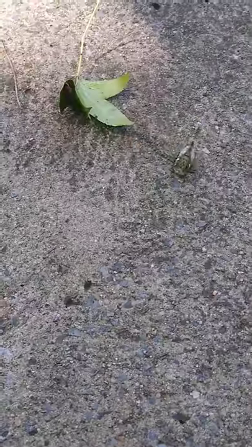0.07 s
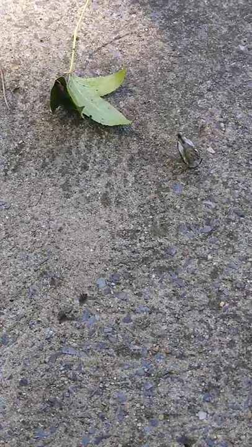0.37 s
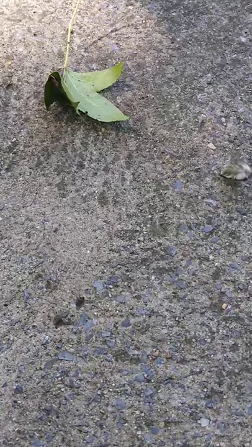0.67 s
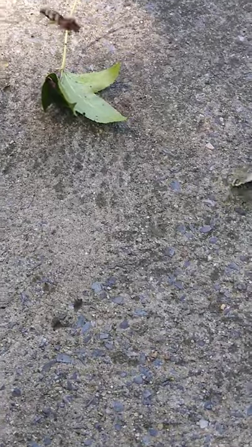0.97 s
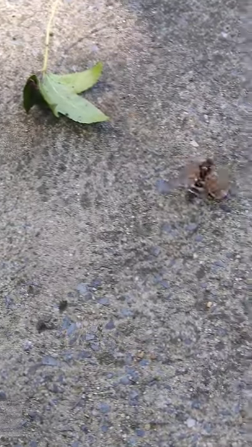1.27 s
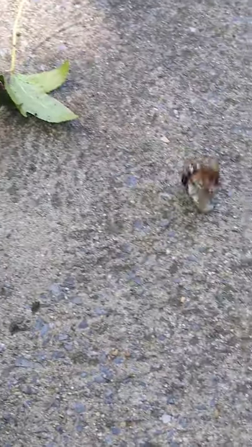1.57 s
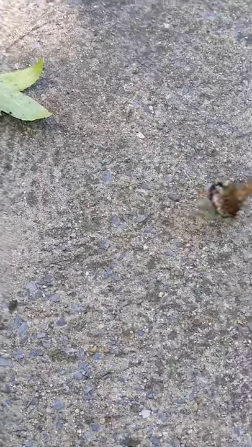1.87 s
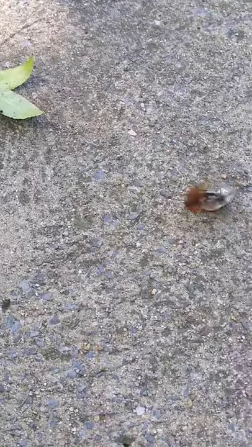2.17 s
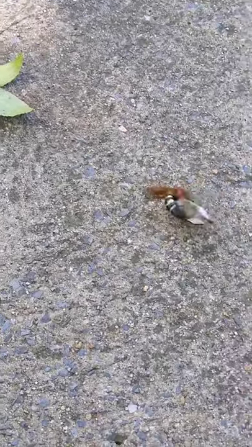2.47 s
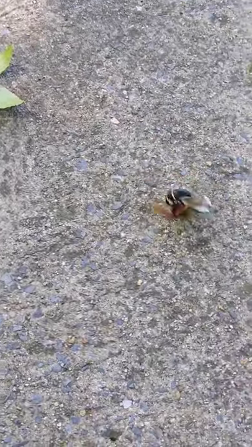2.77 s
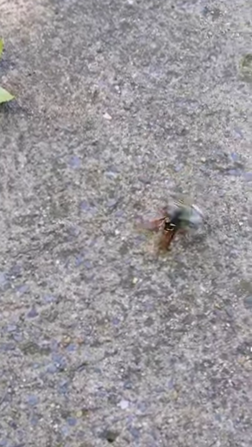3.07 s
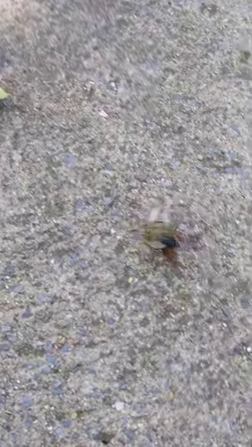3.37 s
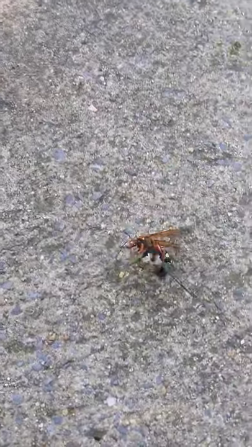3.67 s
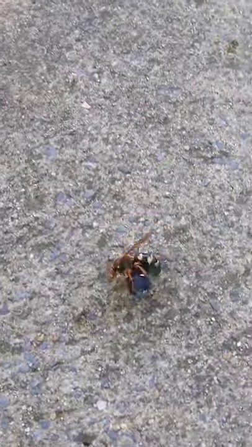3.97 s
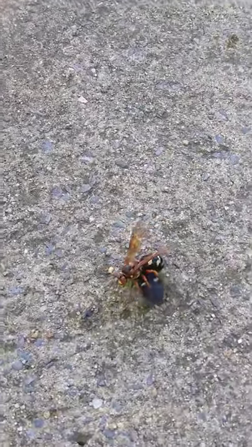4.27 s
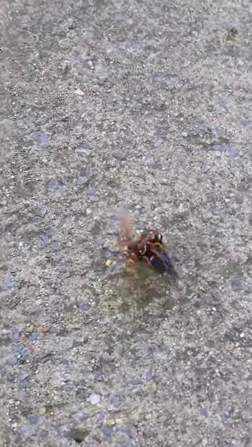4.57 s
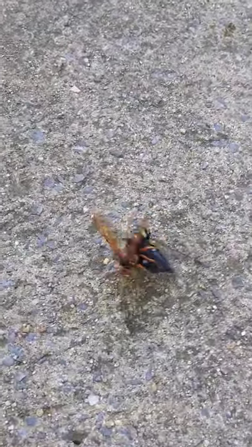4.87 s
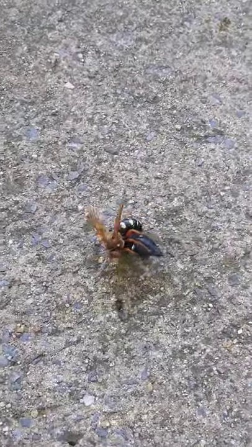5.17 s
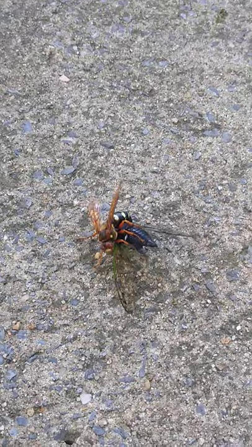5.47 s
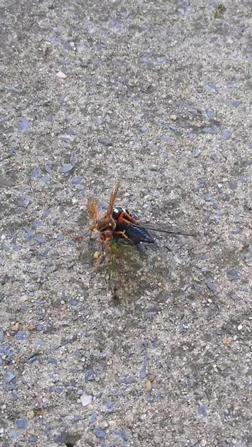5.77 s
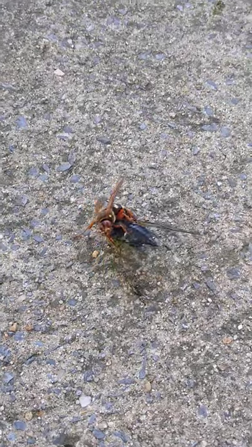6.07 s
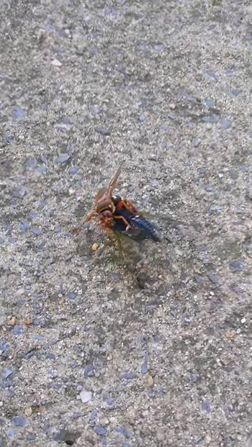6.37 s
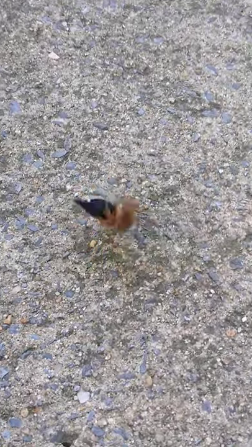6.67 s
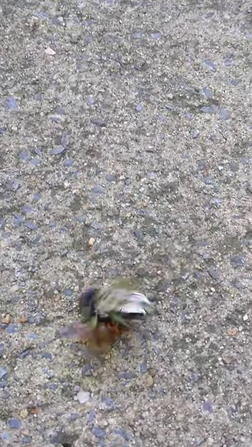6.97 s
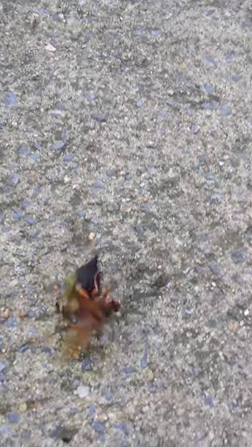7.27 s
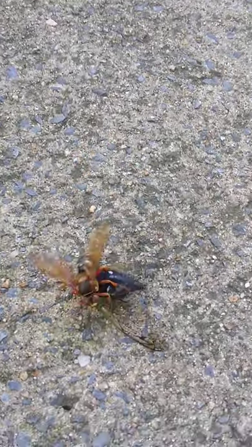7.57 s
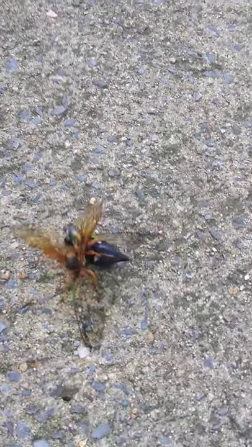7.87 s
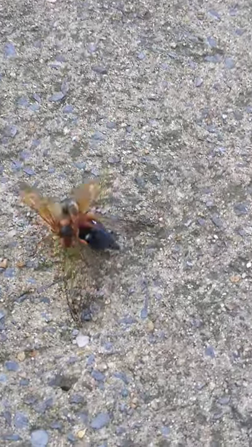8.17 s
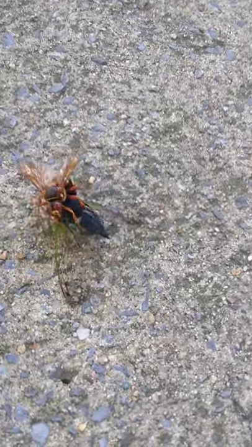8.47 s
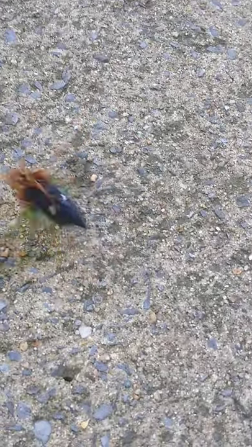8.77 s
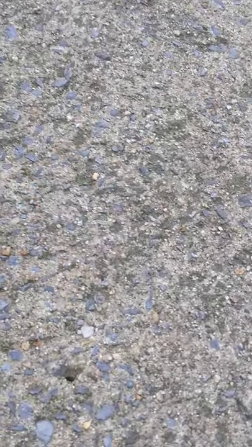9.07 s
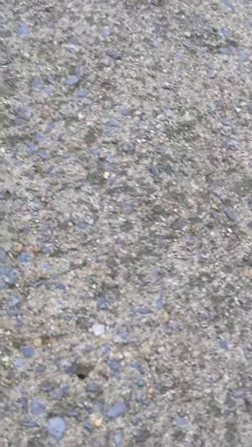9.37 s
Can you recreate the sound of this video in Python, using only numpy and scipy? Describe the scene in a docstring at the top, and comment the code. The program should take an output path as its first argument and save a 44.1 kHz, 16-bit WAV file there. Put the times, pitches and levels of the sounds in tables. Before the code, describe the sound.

A chorus of cicadas hisses steadily outdoors, with one throbbing quickly and a farther one whining. Close to the microphone, a wasp wrestles a cicada on concrete: stiff wings and legs tick sharply and scrape through grit in short spurts. The struggle stops for about two seconds midway, resumes, pauses again and returns briefly at the end. Distant machinery drones faintly underneath.

```python
"""Cicadas hiss in the trees, their ribbed tymbals clicking too densely to tell apart. One stands out,
throbbing about ten times a second as its belly tunes and detunes its call; a farther one whines.
Distant machinery drones underneath. Close by, a wasp wrestles a cicada on concrete:
stiff wings and legs tick against the ground and scrape through the grit in spurts."""
import sys
import numpy as np
from scipy import signal
from scipy.fft import rfft, irfft, next_fast_len
from scipy.io import wavfile
from scipy.ndimage import uniform_filter1d

SR = 44100
rng = np.random.default_rng(int(sys.argv[2]) if len(sys.argv) > 2 else 0)


def master(y):
    """Save y as 16-bit WAV."""
    cut = np.clip(np.atleast_2d(y).T, -1, 1)
    pcm = np.round(cut * 32767)  # scale
    wavfile.write(sys.argv[1], SR, pcm.astype(np.int16))


N = 415863
T = np.arange(N) / SR
TOP_HZ = 8380
WINGBEATS_PER_S, WINGBEAT_JITTER_S = 38, .0025
BLOW_LEAD_SAMPLES = 128  # a faint noise swell ahead of each snap, softening its attack

# swell of the chorus hiss: time_s, level_db
CHORUS_SWELL = [(0, -49), (1.5, -47), (2.4, -49.5), (5.3, -47.5), (7.4, -44), (9.43, -46.5)]
# EQ of the chorus hiss: frequency_hz, gain_db
CHORUS_EQ = [(1500, -25.5), (2100, -18.5), (2750, -10), (3350, -7), (3700, 1), (4250, -1.5), (4900, 1),
             (5800, -0.3), (6100, 0.5), (6500, 0.7), (7700, -3.5), (8000, -17.5), (8500, -37)]
# fader ride of the nearest singer: time_s, level_db
SINGER_SWELL = [(0, -53), (2.4, -58), (3.8, -57), (5.7, -52), (7.1, -50.5), (8.1, -52.5), (9.43, -73)]
# its pace: time_s, throbs_per_s
THROB_PACE = [(0, 9.95), (3.2, 9.35), (4.5, 9.65), (9.43, 9.75)]
# its belly's sweep through one throb: cycle_fraction, tuning_hz, gain_db
THROB_SHAPE = [(0, 5520, 2), (.06, 5300, 6), (.12, 4850, -2.5), (0.199, 4470, -4.5), (.27, 3330, -16),
               (.36, 2400, -9.5), (.58, 2500, -9), (.66, 2960, -3), (.72, 4600, -8), (.8, 5520, 2),
               (.9, 5520, -18), (1, 5520, -4)]
# its belly's ringing modes: pitch_hz, width_hz, gain_db
BELLY_MODES = [(2530, 290, -0.5), (3170, 130, -3.5), (3810, 450, 5.5), (4600, 1100, -8), (4900, 540, 1),
               (5520, 160, -0.5)]
# fader ride of the farther singer: time_s, level_db
WHINE_SWELL = [(0, -54.5), (1, -53), (2.5, -64), (2.9, -65), (5.3, -64.5), (6.2, -61), (7, -62),
               (9.43, -57)]
# swell of the machinery's rumble: time_s, relative_level_db
RUMBLE_SWELL = [(0, -47.5), (.9, -46), (4.3, -48.5), (6.1, -46.5), (7.6, -47), (8.3, -45), (9.43, -47)]
# EQ of far machinery and air: frequency_hz, gain_db
RUMBLE_EQ = [(22, -36.5), (35, -23.5), (52, -1), (80, 3), (100, -4), (132, 2), (165, -2), (215, -6.5),
             (250, -5.5), (290, -14.5), (400, -17.5), (700, -19), (1200, -25), (2000, -38)]
# the machinery's tones: pitch_hz, level_db
HUM_TONES = [(81, -59), (121, -56.5), (233, -57.5), (699, -79)]
# spurts of struggling: start_s, end_s, relative_scrape_db
SCRAPE_SPURTS = [(0.159, 0.235, -63), (0.385, 0.426, -62), (0.503, 0.688, -68.5), (0.87, 1.397, -72),
                 (1.447, 2.072, -65.5), (2.152, 2.658, -68), (2.769, 3.047, -68), (3.14, 3.56, -73.5),
                 (3.639, 3.821, -65.5), (3.899, 3.98, -70.5), (4.143, 4.244, -69.5), (4.339, 4.472, -68),
                 (4.638, 4.79, -67), (6.725, 7.119, -66), (7.235, 7.459, -62), (7.561, 7.676, -64.5),
                 (7.862, 7.945, -65.5), (8.993, 9.416, -67)]
# bright rub of the grit: frequency_hz, gain_db
GRIT_EQ = [(300, -23.5), (900, -9.5), (1400, -4), (2200, 7), (3500, 9.5), (7500, -6)]
# dull drag of bodies on concrete: frequency_hz, gain_db
DRAG_EQ = [(200, -4), (380, 4.5), (580, 6), (850, -3), (1300, -1.5), (2500, -28.5)]
# hard wing or leg hits on the concrete: time_s, relative_level_db, body_over_snap_db
HARD_BLOWS = [(0.0298, -34, -11.5), (0.177, -37.5, -10), (0.306, -38.5, -6), (0.3864, -35.5, -12.5),
              (0.5024, -36.5, -11), (0.5972, -36, -4.5), (0.7892, -37, -6), (0.8692, -37, -13),
              (1.5688, -31.5, -8), (1.6164, -36.5, -8), (1.6557, -33.5, -11), (1.682, -34.5, -3),
              (1.7089, -31.5, -15), (1.7849, -33.5, -13.5), (1.8308, -36.5, -9), (1.8953, -35.5, -18),
              (2.2059, -32, -12), (2.249, -36.5, -8), (2.294, -35.5, -13), (2.2989, -32.5, -18),
              (2.9479, -38.5, -12), (3.273, -36, -13.5), (3.378, -35, -27), (3.423, -38.5, -9.5),
              (3.9184, -38, 1), (4.1579, -38, -8), (4.1936, -34, -6), (4.2225, -37.5, -10),
              (4.4525, -38, -7.5), (4.6948, -31, -3.5), (4.7302, -34, -3.5), (4.7613, -33, -7.5),
              (6.7276, -34.5, -6.5), (6.763, -37.5, -5), (6.8735, -36.5, -3), (7.0881, -37, -1),
              (7.113, -35, -6.5), (7.3695, -34, -9), (7.412, -33, -5), (7.4452, -36.5, -8),
              (7.596, -35.5, -8), (7.6244, -32.5, -8.5), (7.6498, -37, -12), (7.679, -34.5, -9.5),
              (7.889, -37.5, -3.5), (7.9388, -37, -23), (9.0994, -40.5, -9), (9.1532, -38.5, 2),
              (9.178, -39, -2)]
# crisp top of a hit: frequency_hz, gain_db
SNAP_EQ = [(1200, -38), (2400, 0.5), (3200, 3.5), (5000, 3.5), (7500, 7), (9000, -29.5)]
# the body's knock under it: frequency_hz, gain_db
KNOCK_EQ = [(150, -27.5), (450, -0.5), (1000, 1), (2000, 3), (2600, -0.5), (3600, -7), (6000, -19.5)]


def gain_of(db):
    """Decibels to amplitude."""
    return 10 ** (np.asarray(db) / 20)


def unit_rms(x):
    """Scales a signal to rms 1."""
    return x / np.sqrt(np.mean(x ** 2) + 1e-20)


def fader(rows):
    """Rows of time_s, level_db as a gain at every sample."""
    return gain_of(np.interp(T, *np.transpose(rows)))


def equalise(x, eq):
    """Shapes x with an EQ curve drawn on a log-frequency axis and cuts the top, at rms 1."""
    size = next_fast_len(len(x))
    hz = np.fft.rfftfreq(size, 1 / SR)
    eq_hz, eq_db = np.transpose(eq)
    curve = gain_of(np.interp(np.log(hz + 1), np.log(eq_hz), eq_db)) * (hz < TOP_HZ + 500)
    return unit_rms(irfft(rfft(x, size) * curve, size)[:len(x)])


def drift(turns_per_s):
    """A random wander of rms 1."""
    knots = rng.standard_normal(8192)
    return unit_rms(np.interp(T * turns_per_s, np.arange(len(knots)), knots))


def resonate(x, hz, width_hz):
    """A resonance of gain 1 at hz, which may hold still or sweep."""
    carrier = np.exp(2j * np.pi * np.cumsum(hz * np.ones(len(x))) / SR)
    pole = np.exp(-np.pi * width_hz / SR)
    return 2 * (carrier * signal.lfilter([1 - pole], [1, -pole], x / carrier + 1e-18)).real


def belly_ring(clicks, hz, width_hz):
    """A cicada's hollow belly rings: two resonances in series, at rms 1."""
    return unit_rms(resonate(resonate(clicks, hz, width_hz), hz, width_hz))


def tymbal(clicks_per_s=9000):
    """The ribs of the sound organ buckle in a dense train of clicks."""
    return unit_rms(rng.choice([-1, 1], N) * (rng.random(N) < clicks_per_s / SR))


def chorus(shimmer_db=0.8, flutter_db=1.5, low_voices_db=-60):
    """Countless far tymbals merge into a hiss; a lower-voiced group holds steady while the rest swell."""
    _, _, spectrum = signal.stft(rng.standard_normal(N), SR, nperseg=512)
    shimmer = uniform_filter1d(rng.standard_normal(spectrum.shape), size=4, axis=0)  # blur in pitch
    shimmer = unit_rms(uniform_filter1d(shimmer, size=60, axis=1))  # and in time
    hiss = signal.istft(spectrum * gain_of(shimmer_db * shimmer), SR, nperseg=512)[1][:N]
    low_voices = gain_of(low_voices_db) * belly_ring(tymbal(), hz=3090, width_hz=420)
    flutter = gain_of(flutter_db * drift(150))
    return equalise(hiss, CHORUS_EQ) * fader(CHORUS_SWELL) * flutter + low_voices


def compress(x, window_s=0.0037):
    """Holds the strength of a ringing mode even, at rms 1."""
    power = uniform_filter1d(x ** 2, size=round(window_s * SR))
    return x / np.sqrt(abs(power) + 1e-20)


def near_singer(first_throb_s=.035, mode_reach=0.14, upper_ratio=1.4, rasp_db=-17):
    """The belly stretches and shortens with each throb, waking whichever mode it is tuned near."""
    throbs = np.cumsum(np.interp(T, *np.transpose(THROB_PACE))) / SR
    cycle = (throbs - np.interp(first_throb_s, T, throbs)) % 1
    fraction, belly_hz, throb_db = np.transpose(THROB_SHAPE)
    tuning_hz = np.interp(cycle, fraction, belly_hz)
    clicks = tymbal()
    call = gain_of(rasp_db) * belly_ring(clicks, tuning_hz, width_hz=2400)
    for hz, width_hz, db in BELLY_MODES:
        # the air in the belly has a main and an upper resonance
        nearness = sum(np.exp(-(np.log(tuning_hz * k / hz) / mode_reach) ** 2) for k in (1, upper_ratio))
        call += gain_of(db) * nearness * compress(belly_ring(clicks, hz, width_hz))
    throb = gain_of(np.interp(cycle, fraction, throb_db))
    return unit_rms(call * throb) * fader(SINGER_SWELL)


def far_singer(main_hz=5490, upper_hz=6130, upper_db=-3, pulses_per_s=11.2, depth_db=5):
    """Only two belly modes carry from this cicada: a whine pulsing a little faster than the near one."""
    pulse = gain_of(depth_db * np.cos(2 * np.pi * pulses_per_s * T))
    clicks = tymbal()
    main, upper = (belly_ring(clicks, hz, width_hz=320) for hz in (main_hz, upper_hz))
    return unit_rms((main + gain_of(upper_db) * upper) * pulse) * fader(WHINE_SWELL)


def machinery(rumble_trim_db=-1.93, waver_hz=3, waver_db=1.5):
    """A bed of low rumble with a few wavering tones, like a far air conditioner."""
    drone = gain_of(rumble_trim_db) * fader(RUMBLE_SWELL) * equalise(rng.standard_normal(N), RUMBLE_EQ)
    for hz, db in HUM_TONES:
        cycles = np.cumsum(hz + waver_hz * drift(25)) / SR
        drone += np.sqrt(2) * gain_of(db + waver_db * drift(14)) * np.sin(2 * np.pi * cycles)
    return drone


def scrabble(grains_per_s=1300, spread_db=3.5, bite_db=12, drag_db=-2):
    """Legs and wing tips rub the grit in clumps, at the pace of the beating wings."""
    grain_size = gain_of(spread_db * np.minimum(rng.exponential(1, N), 3)) * rng.choice([-1, 1], N)
    since_spurt_s = T - np.max([start * (T >= start) for start, _, _ in SCRAPE_SPURTS], axis=0)
    wing_cycle = (since_spurt_s + WINGBEAT_JITTER_S * drift(30)) * WINGBEATS_PER_S % 1
    bite = np.exp(-wing_cycle / .17)  # each downstroke bites, then drags
    grains = grain_size * (rng.random(N) < grains_per_s / SR) * gain_of(bite_db * bite)
    effort = sum(gain_of(db) * ((T > start) & (T < end)) for start, end, db in SCRAPE_SPURTS)
    effort += gain_of(-74) * np.interp(T, [3.8, 4.8], [1, 0])  # legs scratch until the cicada is pinned
    weight = np.interp(T, [3, 7], [.25, 1])  # the wasp bears down, and the dull drag grows
    rub = equalise(grains, GRIT_EQ) + gain_of(drag_db) * weight * equalise(grains, DRAG_EQ)
    return rub * uniform_filter1d(effort, size=300)


def wing_blow(db, body_db, ring_hz, lead_in_s=.0012, typical_skid_s=.00054):
    """A stiff wing snaps against the ground and skids over a few grains of sand."""
    t = (np.arange(1024) - BLOW_LEAD_SAMPLES) / SR
    skid_s = typical_skid_s * rng.uniform(.7, 1.5)
    envelope = np.where(t > 0, np.exp(-abs(t) / skid_s), .28 * np.exp(-abs(t) / lead_in_s))
    grains = rng.standard_normal(len(t)) * envelope
    grains /= np.linalg.norm(grains)
    crack = t == 0
    snap = equalise(1.1 * crack + grains, SNAP_EQ)
    snap = unit_rms(snap + resonate(snap, ring_hz, width_hz=2600))
    knock = equalise(crack + grains, KNOCK_EQ)  # the body stops in one short jolt
    hit = unit_rms(snap + gain_of(body_db) * knock)
    return gain_of(db) * hit * np.sqrt(SR / 100 / len(t))  # the energy of 10 ms at this level


def ground_scatter(x, tail_db=-4.0, t60_s=0.036, predelay_s=.0008):
    """Open air: a very short tail off the ground, different for each spot that is struck."""
    t = np.arange(2048) / SR
    response = rng.standard_normal(len(t)) * gain_of(-60 * t / t60_s) * (t > predelay_s)
    response *= gain_of(tail_db) / np.linalg.norm(response)
    response[0] = 1
    return signal.oaconvolve(x, response)


def light_touches(chance=.65, lift_db=23, spread_db=2, body_db=-8, body_spread_db=3, clear_s=.015):
    """Between hard blows, many wingbeats just tap the ground: a cue list laid out like HARD_BLOWS."""
    cues, max_beats = [], 24
    hard_s = np.array(HARD_BLOWS)[:, 0]
    for start_s, end_s, scrape_db in SCRAPE_SPURTS:
        touches = rng.random(max_beats) < chance
        force, body, lag = rng.standard_normal((3, max_beats))
        touches[0], lag[0] = True, 0  # each spurt opens with a downstroke
        for k in np.flatnonzero(touches):
            time_s = start_s + k / WINGBEATS_PER_S + WINGBEAT_JITTER_S * lag[k]
            if time_s < end_s and abs(hard_s - time_s).min() > clear_s:
                level_db = scrape_db + lift_db + spread_db * force[k]
                cues.append((time_s, level_db, body_db + body_spread_db * body[k]))
    return cues


def place(track, start_s, sound):
    """Lays a sound onto the track at start_s."""
    start = round(start_s * SR)
    sound = sound[max(-start, 0):]
    part = track[max(start, 0):][:len(sound)]
    part += sound[:len(part)]


def struggle(blows_trim_db=-4.5, scrabble_trim_db=9.0, ring_hz=5700, ring_spread_hz=1500):
    """The two insects scrabble and strike the concrete; each blow rings a different part of a wing."""
    rub, blows = scrabble(), np.zeros(N)
    for time_s, db, body_db in list(HARD_BLOWS) + light_touches():
        hit = wing_blow(db, body_db, ring_hz + ring_spread_hz * rng.uniform(-1, 1))
        place(blows, time_s - BLOW_LEAD_SAMPLES / SR, ground_scatter(hit))
    return gain_of(blows_trim_db) * blows + gain_of(scrabble_trim_db) * rub


def scene():
    """A mono mix: cicadas and machinery as the bed, the struggle up front."""
    return (chorus() + near_singer() + far_singer() + machinery() + struggle())[None]


def record(dry):
    """A steep low-pass takes the top off the whole mix."""
    low_pass = signal.firwin(201, TOP_HZ, window=("kaiser", 8), fs=SR)
    return signal.oaconvolve(dry, low_pass[None], "same")


dry = scene()
out = record(dry)
master(out)
```